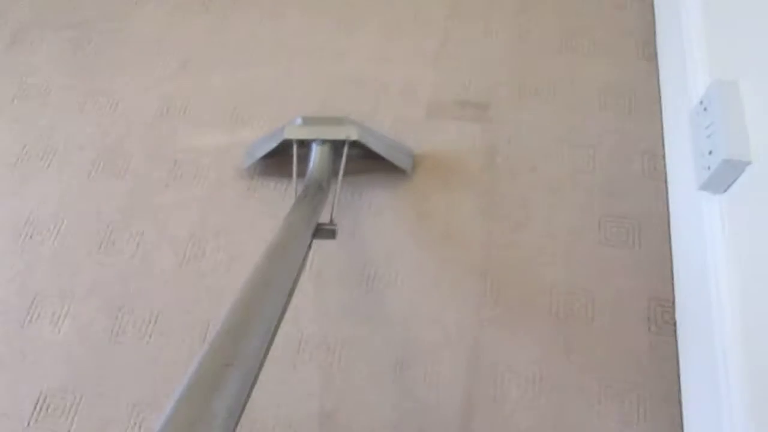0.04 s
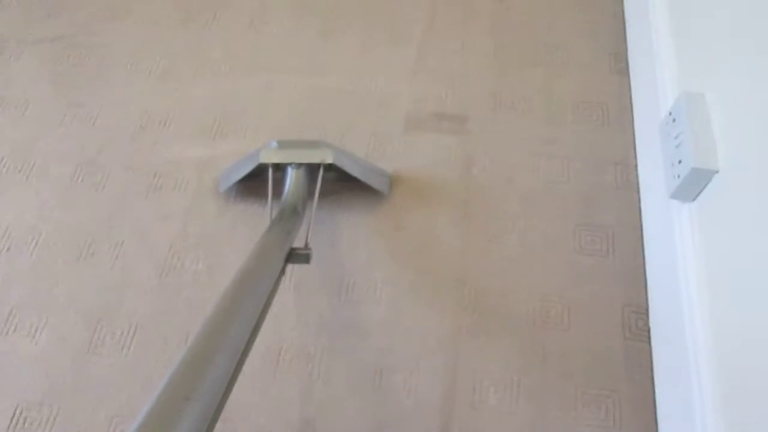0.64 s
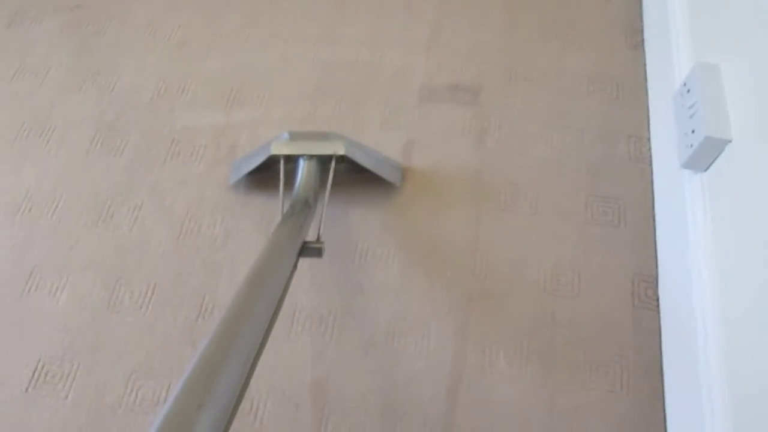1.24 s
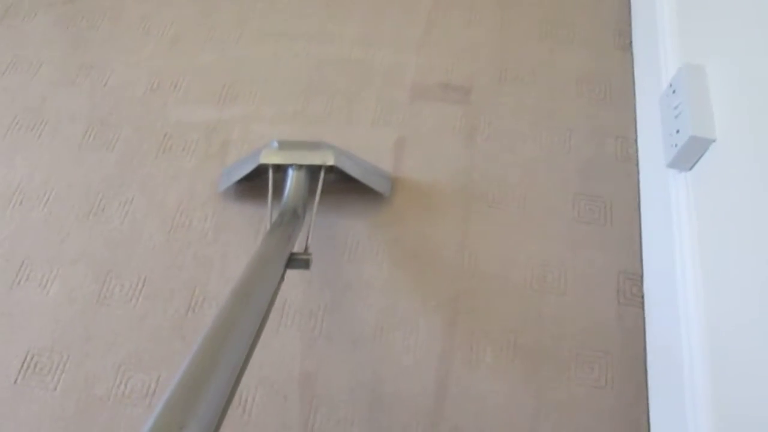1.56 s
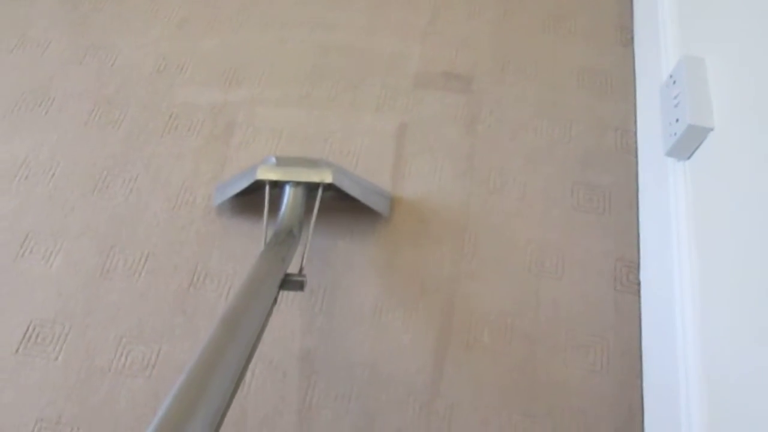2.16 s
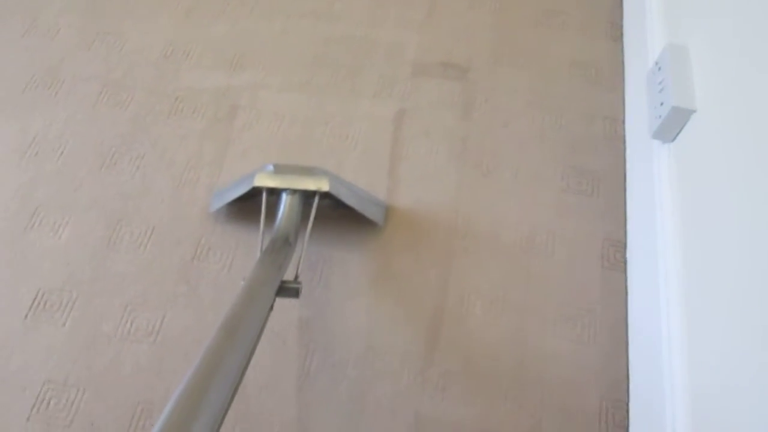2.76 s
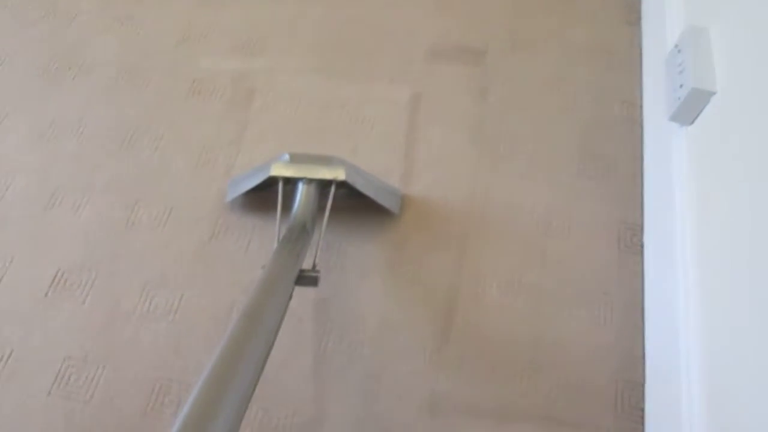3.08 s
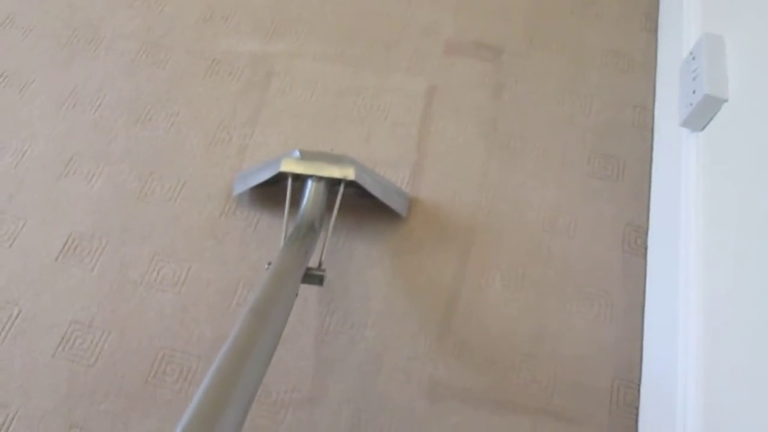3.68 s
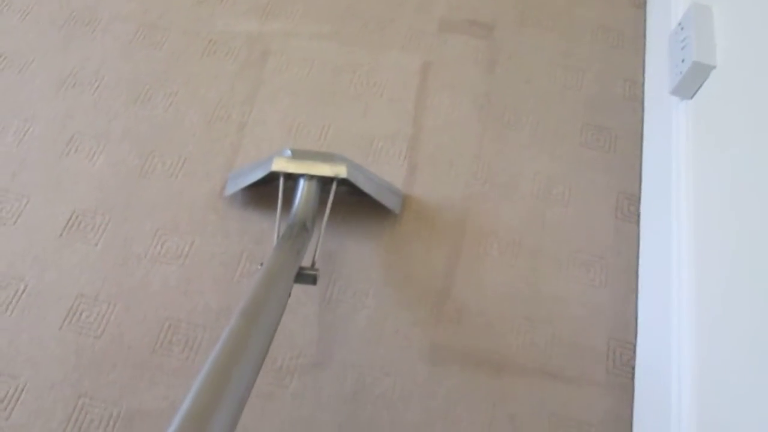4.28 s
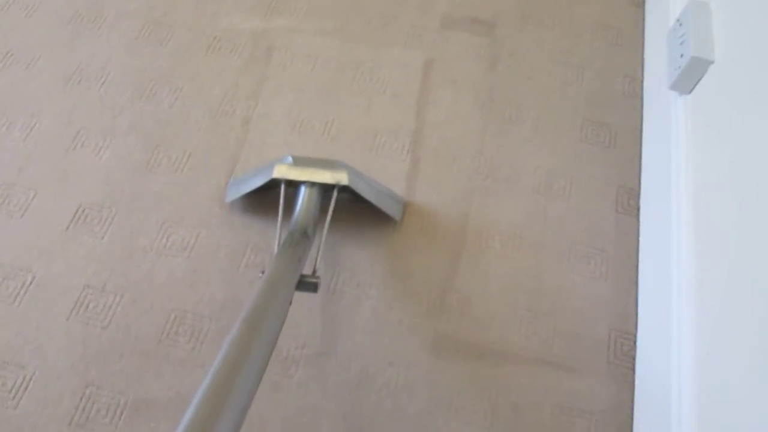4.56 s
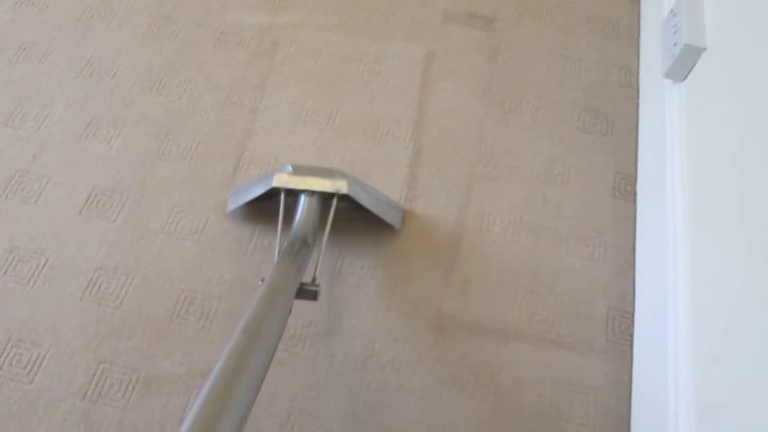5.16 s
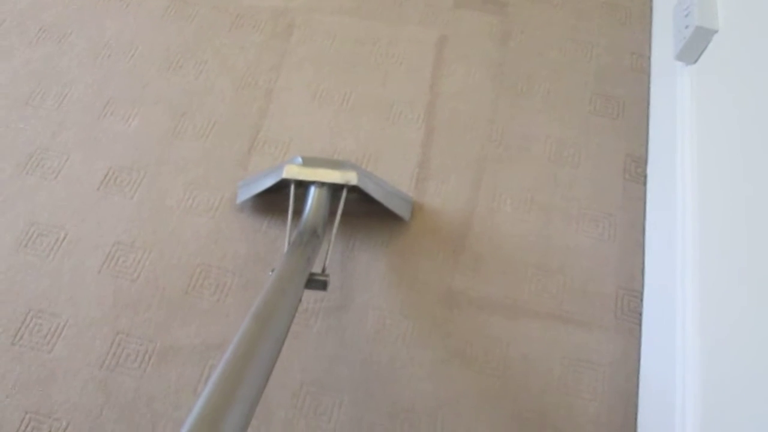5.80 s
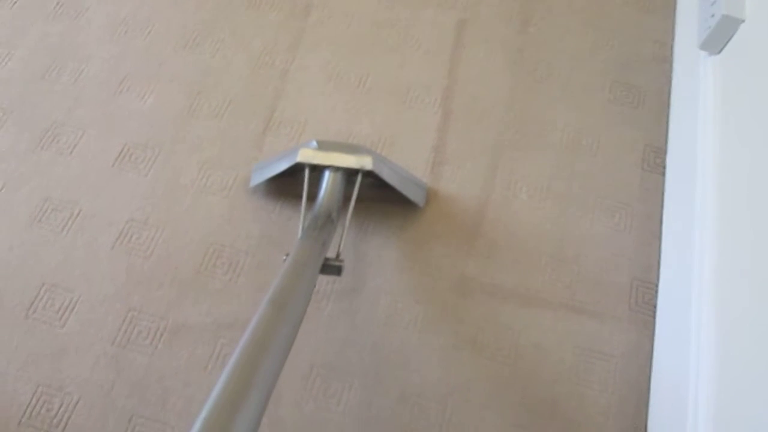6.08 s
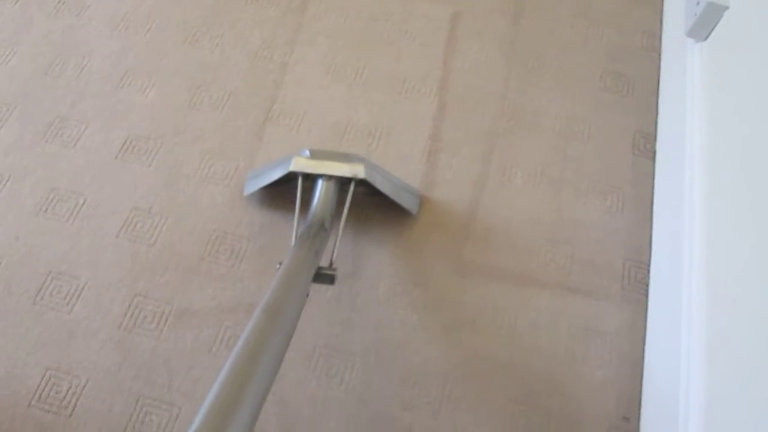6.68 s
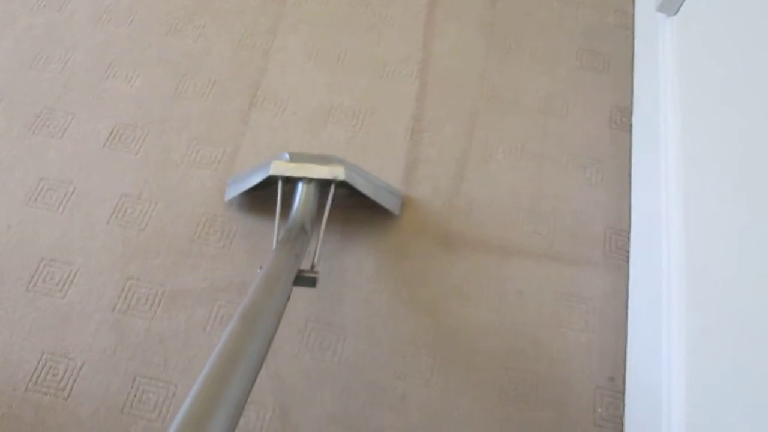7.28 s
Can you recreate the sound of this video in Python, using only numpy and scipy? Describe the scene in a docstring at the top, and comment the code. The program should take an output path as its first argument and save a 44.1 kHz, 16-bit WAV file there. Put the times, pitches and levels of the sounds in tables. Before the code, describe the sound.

Close, wet suction hiss from a carpet cleaner's wand, briefly choking as it drags, with light slurping and a far-off vacuum motor.

```python
"""A bright, wet hiss, close up: a carpet cleaning wand is drawn slowly over wet carpet in a small room.
The stereo microphone rides on the handle. Air and spray tear through the narrow suction slot, which
chokes now and then as the pile catches it. Just behind the hiss, air rushes in the steel head, water
slurps up the tube and a draught leaves by the hose. Far off, the vacuum motor hums faintly."""
import sys
import numpy as np
from scipy import signal
from scipy.fft import rfft, irfft, next_fast_len
from scipy.io import wavfile
from scipy.ndimage import uniform_filter1d, minimum_filter1d, map_coordinates

SR = 44100
rng = np.random.default_rng(int(sys.argv[2]) if len(sys.argv) > 2 else 0)


def generate_wav(sig):
    """Save sig (samples, or channels by samples) to the path in sys.argv[1] as 16-bit PCM at SR."""
    pcm = np.round(np.clip(np.atleast_2d(sig).T, -1, 1) * 32767).astype(np.int16)
    wavfile.write(sys.argv[1], SR, pcm)


N = 323694

# The far motor's hum. Each row: pitch in Hz, level in dB.
MOTOR_HUM = [(96, -82)]
# Broad colours of motor, hose, water, head and slot. Each row: frequency in Hz, relative level in dB.
RUMBLE_COLOUR = [(20, -25), (45, -19), (65, -4), (90, -1.5), (115, -6), (145, 1.5), (175, -11.5),
                 (300, -20), (800, -38)]
HOSE_COLOUR = [(120, -26), (200, -6.5), (300, -6.5), (400, -1.5), (500, -1), (750, -9.5), (1500, -39)]
WATER_COLOUR = [(280, -27.5), (450, -8.5), (600, -3.5), (880, 1), (1150, 0.5), (1500, -1), (2100, -3),
                (4000, -39)]
HEAD_COLOUR = [(900, -30), (1600, -11.5), (1900, -3.5), (2400, -4), (2850, -0.5), (3500, 1), (4200, -4),
               (6500, -48)]
SLOT_COLOUR = [(2200, -50), (3400, -24.5), (3800, -7.5), (4100, -2), (4700, -1.5), (5600, -1), (6400, -11),
               (7000, -15), (7700, -21), (8700, -22.5), (10200, -29.5), (11200, -36), (12600, -47),
               (15500, -55)]
# Resonances of the tube's air column and the steel head. Each row: centre in Hz, width in Hz, lift in dB.
TUBE_RESONANCES = [(234, 26, 4.7), (331, 15, 8.1), (395, 24, 2.4), (552, 11, 7.2), (610, 23, 3.2),
                   (663, 7.3, 3.8), (738, 15, 4.8), (820, 19, 3.4), (886, 33, 2.8), (933, 13, 2.3),
                   (976, 30, 1.7), (1080, 23, 3.5)]
HEAD_RESONANCES = [(1947, 180, 2), (2090, 50, 1), (2810, 180, 1), (4110, 210, 0.5), (4620, 440, 2.5),
                   (5600, 260, 0.5), (6900, 260, 2), (8300, 280, 2), (9400, 220, 1), (10010, 140, 2.5)]
# The hose's draught grows as the stroke gets going. Each row: time in seconds, relative level in dB.
DRAUGHT_LEVELS = [(.04, -58), (1.2, -57.5), (2.0, -56.5), (7.33, -54)]
# Hollow puffs in the hose and gulps of water up the tube.
# Each row: middle in seconds, half length in seconds, swell in dB (a dip if negative).
HOSE_PUFFS = [(.95, .05, -1), (2.09, 0.079, 3), (3.24, .04, -2), (3.44, 0.04, 6), (5.98, .09, 6)]
WATER_GULPS = [(.663, .06, 2.5), (.955, 0.058, 6), (1.226, .05, 1.5), (2.3, 0.087, 4), (2.65, .03, 4.5),
               (2.801, .023, 6.5), (3.244, .057, 5.7), (3.883, .04, 3), (6.423, 0.032, 4),
               (6.713, 0.037, 2), (7.147, 0.066, 4)]
# Resonances of tube and head that sing out.
# Each row: middle in seconds, length in seconds, pitch in Hz, level at the middle in dB.
WHISTLE_NOTES = [(.5, 2.4, 613.5, -54.5), (2.204, 1.7, 867, -51.5), (2.3, 0.4, 1990, -45),
                 (2.5, 1.4, 389.4, -60), (3.1, 1.2, 1410, -50.5), (3.45, 0.605, 397, -59),
                 (3.897, 2.4, 337.7, -64), (4.3, 1.4, 820, -59), (5.3, 1.8, 732, -57),
                 (7.05, 1.4, 613, -53)]
# The stroke's slow course. Each row: time in seconds, then relative levels of hiss, rush and slurp in dB.
STROKE_LEVELS = [(0.04, -24, -32.5, -44), (0.6, -20.5, -30, -38.5), (1.1, -21.5, -32, -39.5),
                 (1.75, -22.0, -30.5, -38), (2.3, -20.5, -31.5, -39.5), (2.95, -22.4, -32.5, -40.5),
                 (3.25, -20.5, -31, -40.5), (3.7, -23.0, -34.5, -43), (3.92, -21.5, -32, -41.4),
                 (4.45, -22, -32.5, -41.5), (5.1, -22.5, -33, -41.5), (5.55, -22, -34.5, -43.1),
                 (5.85, -20.9, -31, -42.5), (6.5, -21.5, -32, -39.5), (6.95, -22.5, -34, -42),
                 (7.33, -21.5, -34, -43.5)]
# The pile catches the slot.
# Each row: time in seconds, surge before it in dB (none if negative), sag in dB, recovery in seconds.
PILE_CHOKES = [(.095, 4.5, 2, .055), (.203, 5, 1.5, .02), (.759, -0.5, 3, .085), (.985, 1.5, 1.5, .07),
               (1.055, -1.5, 4, .1), (1.348, 0, 2.5, 0.046), (1.525, -1.5, 2, .14), (1.775, 0.5, 2.5, .09),
               (1.928, -0.5, 5, .075), (2.364, 0, 3, .06), (2.66, 1.5, 3.5, 0.043), (2.813, 1, 3, .1),
               (3.314, -3, 3.5, 0.087), (3.48, 3, 2, .06), (3.643, 3.5, 0.1, .12), (4.46, 5, 3, .03),
               (4.764, 1.5, 2, 0.037), (4.947, 2.5, 2.3, .06), (5.254, 1.5, 3.5, 0.042),
               (5.483, 0.5, 3, .09), (6.074, 0, 3, 0.054), (6.443, 1.5, 3, .022), (6.76, -0.5, 2.5, .064),
               (6.889, 1, 2.3, .018)]
# Stereo width of the hiss at the microphone. Each row: frequency in Hz, side relative to middle in dB.
HISS_WIDTH = [(1500, -55), (2600, -27), (3600, -20), (5500, -20), (9000, -17), (12500, -8)]


def amp(db):
    """Decibels to gain."""
    return 10 ** (np.asarray(db) / 20)


def unit(x):
    """Scale to rms 1."""
    return x / np.sqrt(np.mean(x ** 2) + 1e-20)


def along(points, hz):
    """Read (Hz, value) points at hz, on a log frequency axis."""
    freqs, values = np.transpose(points)
    return np.interp(np.log(hz + 1), np.log(freqs + 1), values)


def curves(rows):
    """One value per sample for each column after the time."""
    times, *columns = np.transpose(rows)
    return [np.interp(np.arange(N) / SR, times, column) for column in columns]


def swells(rows):
    """Level change in dB from a table of smooth swells."""
    t = np.arange(N) / SR
    return sum(db * np.exp(-((t - middle) / half) ** 2) for middle, half, db in rows)


def wobble(rate, size=N):
    """A smooth random curve with rate knots a second."""
    knots = rng.standard_normal(int(size * rate / SR) + 4)
    return map_coordinates(knots, [np.arange(size) * rate / SR])


def filtered(x, response):
    """Filter x by a gain given as a function of Hz."""
    size = next_fast_len(N + SR // 2)
    return irfft(rfft(x, size) * response(np.fft.rfftfreq(size, 1 / SR)), size)[..., :N]


def resonate(x, colour, modes):
    """x through a broad colour lifted at each resonance, at rms 1."""
    lift = lambda f: sum(db / (1 + (2 * (f - hz) / width) ** 2) for hz, width, db in modes)
    return unit(filtered(x, lambda f: amp(along(colour, f) + lift(f))))


def wet_air(drops_per_s, drops_db):
    """Turbulence plus the tiny impacts of droplets carried along in it."""
    impacts = (rng.random(N) < drops_per_s / SR) * rng.standard_normal(N)
    return unit(rng.standard_normal(N) + amp(drops_db) * unit(impacts))


def motor(rumble_db, drift_hz, waver_db):
    """The vacuum motor, far from the microphone: a wavering hum over a dull rumble."""
    hum = np.zeros(N)
    for hz, db in MOTOR_HUM:
        gain = amp(db + waver_db * wobble(6.5))
        phase = 2 * np.pi * np.cumsum(hz + drift_hz * wobble(9)) / SR
        hum += gain * unit(np.sin(phase))
    return hum + amp(rumble_db) * resonate(rng.standard_normal(N), RUMBLE_COLOUR, [])


def room(x, t60, wet_db):
    """Short echoes off the near walls; their pattern, and so their colour, changes as the wand moves."""
    hop, t = SR // 2, np.arange(SR // 4) / SR
    out = np.zeros(N)
    for centre in range(0, N + hop, hop):
        span = np.arange(max(centre - hop, 0), min(centre + hop, N))
        crossfade = np.cos(np.pi / 2 * (span - centre) / hop)
        tail = rng.standard_normal(len(t)) * amp(-60 * t / t60) * (t > .003)
        echo = signal.fftconvolve(x[span] * crossfade, tail / np.linalg.norm(tail))
        out[span[0]:span[0] + len(echo)] += echo[:N - span[0]]
    return amp(wet_db) * out


def hose_draught(gulp_share=0.21):
    """The low, hollow rush of air leaving through the hose; it swells with puffs and gulps."""
    draught_db, = curves(DRAUGHT_LEVELS)
    level_db = draught_db + swells(HOSE_PUFFS) + gulp_share * swells(WATER_GULPS) + wobble(25)
    return amp(level_db) * resonate(rng.standard_normal(N), HOSE_COLOUR, TUBE_RESONANCES)


def whistles(q=20):
    """Turbulence feeds narrow resonances: breathy tones that swell and fade."""
    out, time = np.zeros(N), np.arange(N) / SR
    for middle, length, hz, db in WHISTLE_NOTES:
        sounding = abs(time - middle) < length / 2
        t = time[sounding]
        phase, width_hz = 2 * np.pi * hz * t, hz / q
        tone = wobble(width_hz, len(t)) * np.cos(phase) + wobble(width_hz, len(t)) * np.sin(phase)
        out[sounding] += amp(db) * np.cos(np.pi * (t - middle) / length) * unit(tone)
    return out


def tube_slurp(level_db):
    """Water is lifted in ragged gulps that sound the air column of the tube."""
    water = wet_air(drops_per_s=500, drops_db=-7.5) * amp(0.76 * wobble(80))
    return amp(level_db - 2.1) * resonate(water, WATER_COLOUR, TUBE_RESONANCES)


def steel_head(air, colour, shift_db=1.08, shifts_per_s=2.17):
    """Air sounds the head's resonances; each swells and fades at random as the wand moves."""
    steady = resonate(air, colour, HEAD_RESONANCES)
    out = steady.copy()
    for hz, width, _ in HEAD_RESONANCES:
        band = filtered(steady, lambda f: 1 / (1 + (2 * (f - hz) / width) ** 2))
        out += (amp(shift_db * wobble(shifts_per_s)) - 1) * band
    return out


def head_rush(level_db):
    """Wet air swirls in the hollow steel head."""
    swirl = steel_head(wet_air(drops_per_s=1200, drops_db=-7.5), HEAD_COLOUR)
    return amp(level_db + 0.66 * wobble(70) - 1.15) * swirl


def choking(build_s=0.022):
    """Level change in dB as the pile catches: the flow builds, breaks off in milliseconds, recovers."""
    t, level_db = np.arange(N) / SR, np.zeros(N)
    for catch, surge_db, sag_db, recovery in PILE_CHOKES:
        near = abs(t - catch) < .4
        lag = t[near] - catch
        shut = (1 + np.tanh(lag / .001)) / 2
        level_db[near] += (1 - shut) * max(surge_db, 0) * np.exp(-abs(lag) / build_s)
        level_db[near] -= shut * max(sag_db, 0) * np.exp(-(lag / recovery) ** 2)
    return level_db


def slot_hiss(level_db):
    """Air and spray tear through the slot; the walls return a little of it differently to each side."""
    flutter_db = 0.48 * wobble(45) + 0.43 * wobble(320)
    direct = steel_head(wet_air(drops_per_s=3500, drops_db=-8.0), SLOT_COLOUR)
    scattered = resonate(rng.standard_normal(N), SLOT_COLOUR, HEAD_RESONANCES)
    side = filtered(scattered, lambda f: amp(along(HISS_WIDTH, f)))
    return amp(level_db + flutter_db - 3.0) * np.array([direct + side, direct - side])


def wand(drag_db=0.7, drags_per_s=17):
    """Hiss, rush and slurp follow the slot's seal as it drags over the pile; whistles sing beneath."""
    hiss_db, rush_db, slurp_db = curves(STROKE_LEVELS)
    seal_db = choking() + drag_db * wobble(drags_per_s)
    gulp_db = swells(WATER_GULPS)
    # A choke cuts the hiss most; a gulp lifts the slurp most.
    hiss = slot_hiss(hiss_db + seal_db)
    rush = head_rush(rush_db + 0.94 * seal_db + 0.36 * gulp_db)
    slurp = tube_slurp(slurp_db + 0.5 * seal_db + gulp_db)
    return hiss + rush + slurp + whistles()


def scene():
    """From the handle: wand and hose close by, the small room around them, the motor far behind."""
    close = wand() + amp(-1.5) * hose_draught()
    echoes = room(close.mean(axis=0), t60=0.15, wet_db=-13.0)
    return close + echoes + motor(rumble_db=-69.0, drift_hz=1.7, waver_db=6.5)


def record(dry):
    """The sound begins after a brief silence; a limiter eases the peaks and the highest treble is cut."""
    start_s, top_hz = .036, 15700
    ceiling, hold = .24, SR // 200  # the limiter holds for 5 ms
    needed = ceiling / np.maximum(abs(dry).max(axis=0), ceiling)
    gain = uniform_filter1d(minimum_filter1d(needed, hold), hold)
    live = np.arange(N) / SR > start_s
    return filtered(dry * gain * live, lambda hz: hz < top_hz)


dry = scene()
out = record(dry)
generate_wav(out)
```